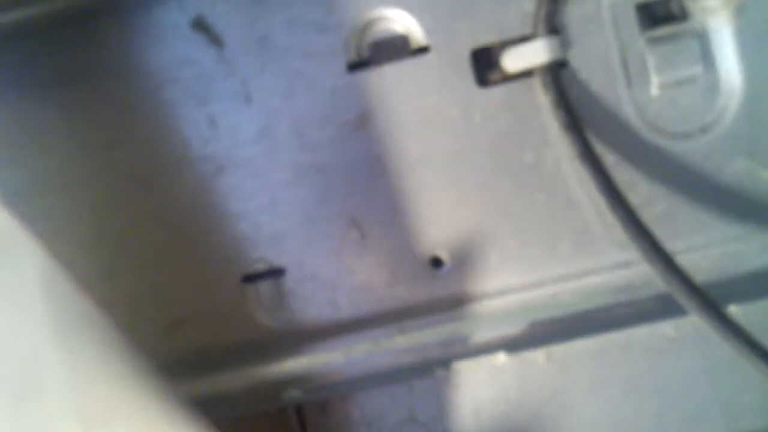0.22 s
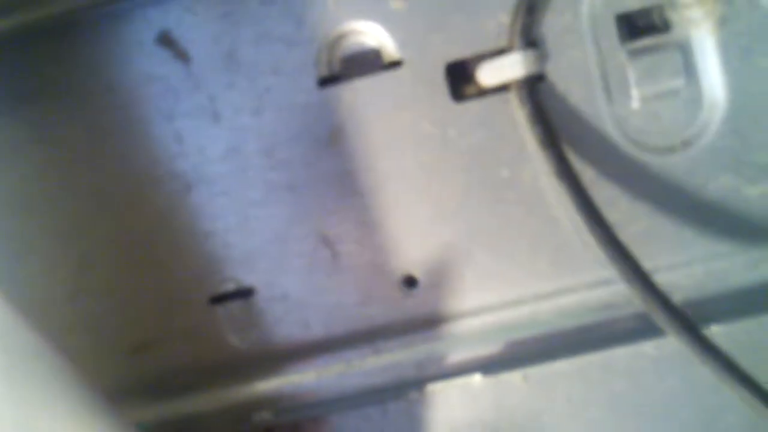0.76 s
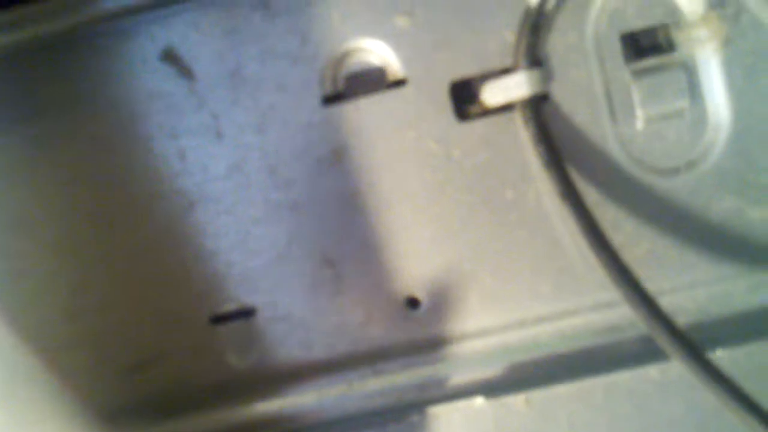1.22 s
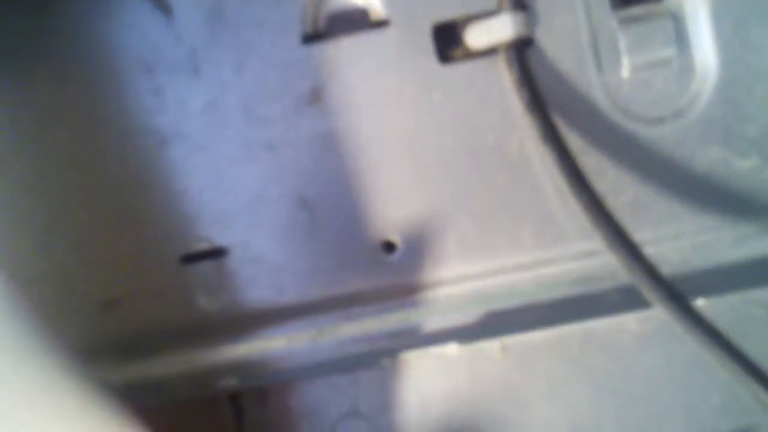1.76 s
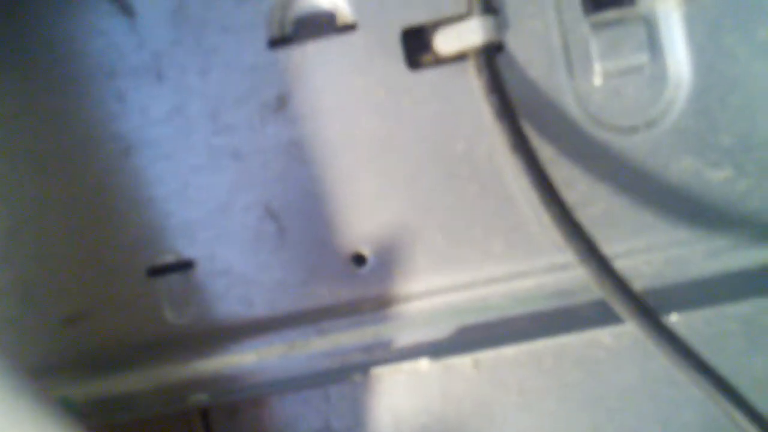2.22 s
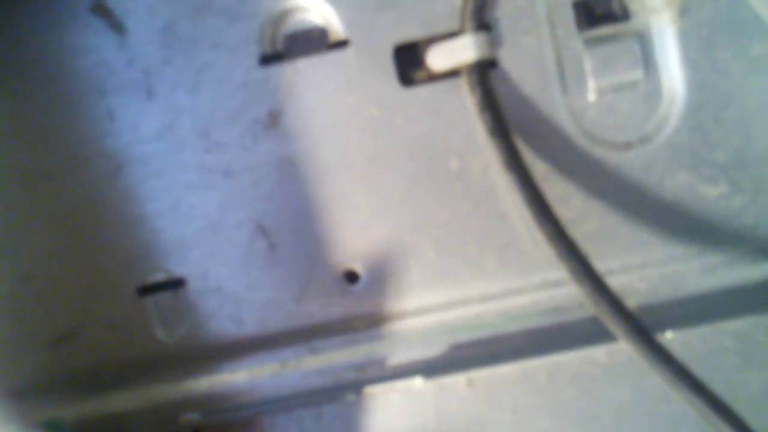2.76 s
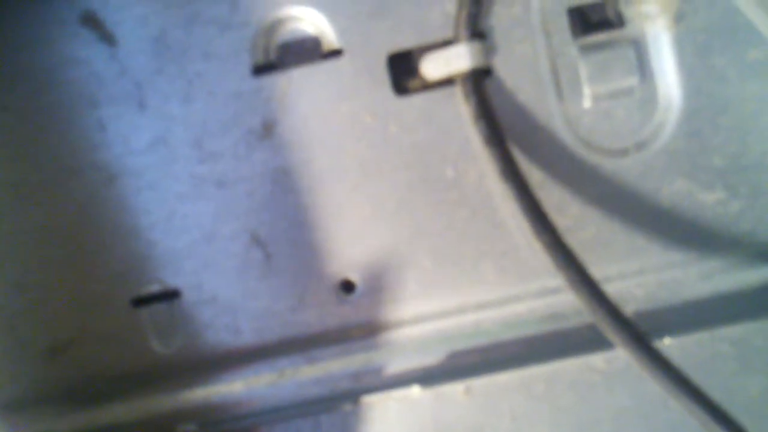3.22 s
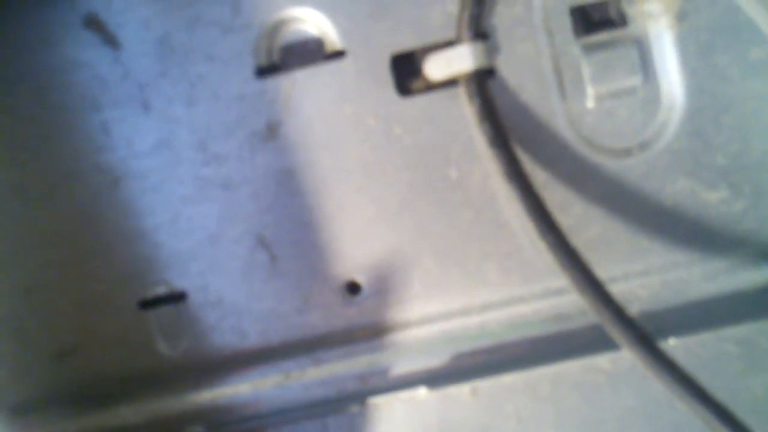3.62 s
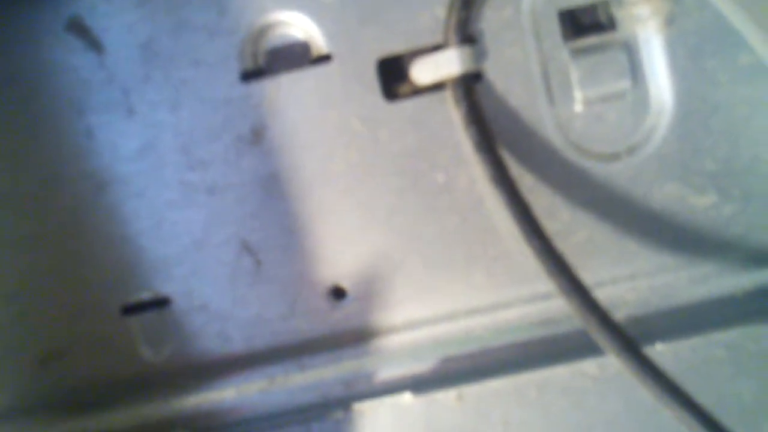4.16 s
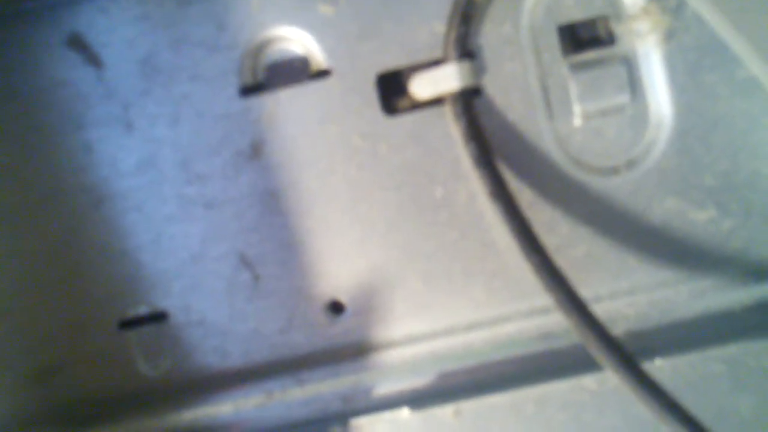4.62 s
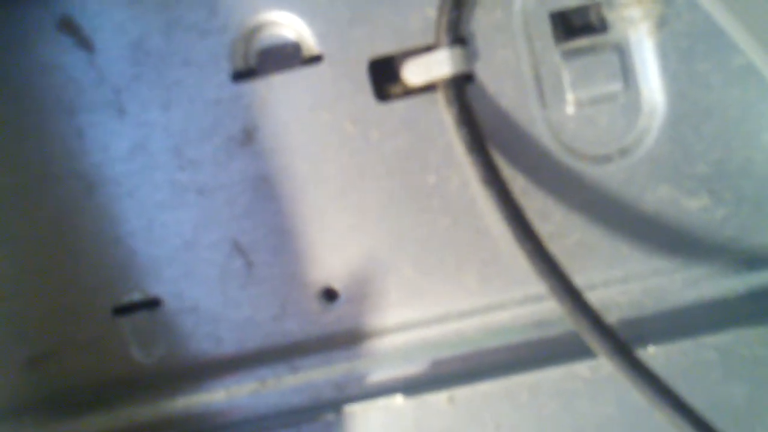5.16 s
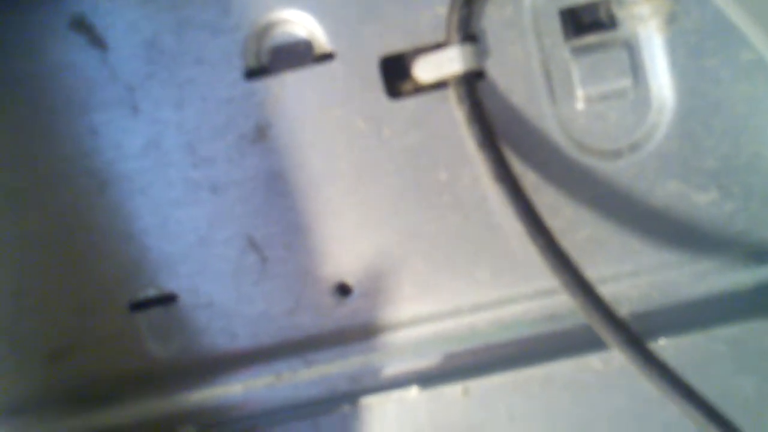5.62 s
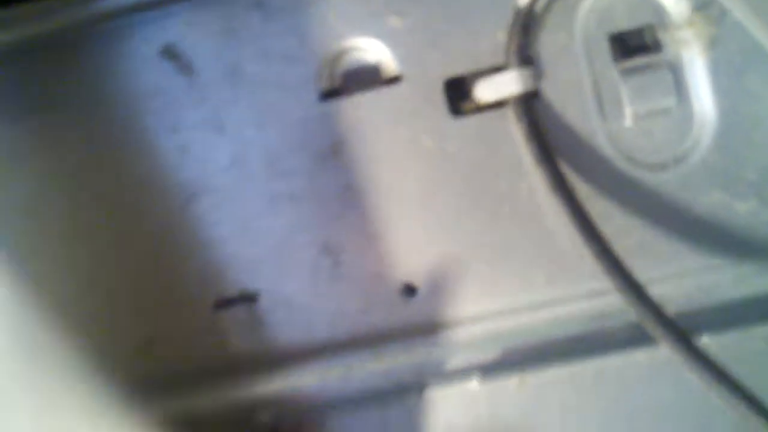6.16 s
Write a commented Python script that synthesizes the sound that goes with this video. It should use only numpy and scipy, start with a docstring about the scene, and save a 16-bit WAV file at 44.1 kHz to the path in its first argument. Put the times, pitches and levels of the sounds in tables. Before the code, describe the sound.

In a quiet room, a hand fits a memory stick into an open steel computer case. A faint tick and light brushing lead to sharp, bright double knocks, then scattered taps, short scrapes and small finger creaks on the camera. The heaviest, fuller metallic clunk comes near the end, followed by a tap, creaks and a brush. Close wide stereo handheld microphone with soft hiss.

```python
"""Port hiss and quiet room air, both shaped noise, run throughout: a hand seats a memory stick in an open
sheet-steel computer case. A faint tick and a brush (sparse slips through the case) lead to firm knocks near
0.5 s: noise cracks, case clatter and panel modes. Scrapes (slips driving the case), lighter contacts, brushes
and finger creaks on the camera (noise bursts) follow. The heaviest knocks come near 6 s, then creaks and
a last brush. The camera's two close ports are cross-subtracted to widen the stereo."""
import sys
import numpy as np
from scipy import signal
from scipy.fft import rfft, irfft, next_fast_len
from scipy.io import wavfile
from scipy.ndimage import uniform_filter1d

SR = 44100
rng = np.random.default_rng(int(sys.argv[2]) if len(sys.argv) > 2 else 0)


def digitize_waveform(pressure):
    """Quantize a signal to 16-bit integers and store it at the path in sys.argv[1].

    Rows of a 2-D input are taken as channels; values are limited to [-1, 1].
    """
    field = np.atleast_2d(pressure).T
    bounded = np.clip(field, -1, 1)
    quanta = np.round(bounded * 32767).astype(np.int16)
    wavfile.write(sys.argv[1], SR, quanta)


N = 282240

# Relative spectrum of each port's steady hiss: (frequency [Hz], level [dB])
HISS_SPECTRUM = [(20, -37), (50, -15), (100, 3.5), (170, -0.5), (300, 0), (500, -8), (900, -12),
                 (1500, -18), (2500, -24), (4000, -22.5), (5500, -26), (8000, -19.5), (13500, -18.5)]
# Relative spectrum of the still room air: (frequency [Hz], level [dB])
AIR_SPECTRUM = [(20, -55), (60, -58), (150, 19), (300, 10.5), (700, -7.5), (1100, -6), (1800, -3),
                (4000, -7), (12000, -33)]
# Sweeps of the hand over cables and metal: (time of height [s], half length [s], relative level [dB])
BRUSHES = [(0.33, 0.37, -63), (1.46, 0.37, -66.5), (2.496, 0.72, -71.5), (4.12, .07, -71.5),
           (5.2, 0.39, -72), (5.864, 0.13, -60), (6.4, 0.085, -57.5)]
# Runs of finger slips on the camera: (time of first slip [s], slips [count], gap [s],
# half length of a slip [s], relative creak level [dB], mid-run accent [dB], relative thump level [dB])
GRIPS = [(.832, 1, 0, 0.0024, -67, -2, -50.5), (1.6413, 1, 0, 0.00092, -39, -2.5, -32),
         (3.008, 4, 0.0086, 0.0033, -47.5, 11, -39.5), (5.339, 5, .0545, 0.0078, -58.5, 8.5, -56.5),
         (6.346, 3, 0.023, 0.0083, -44, -1.5, -47.5)]
# Resonances of the camera's plastic shell: (frequency [Hz], level [dB])
SHELL_SPECTRUM = [(60, -26), (300, -17), (700, -9), (1050, 11.5), (1350, 3), (1680, -6.5), (2100, -18.5),
                  (4000, -28.5), (13000, -47)]
# Low thump through the camera body: (frequency [Hz], level [dB])
THUMP_SPECTRUM = [(30, -37), (80, -12.5), (160, 24), (350, 7.5), (700, 4.5), (1500, -75), (6000, -77)]
# Slides of the stick: (time [s], relative level [dB], bass [dB], body [dB], hardness [dB],
# ring frequency [Hz], half length [s])
SCRAPES = [(.639, -38.5, 3, 2.5, 0.5, 840, 0.018), (1.195, -47.5, 9.5, 5.5, -1.5, 640, 0.031),
           (1.376, -36, -19, 2, -3.5, 1090, 0.01), (1.451, -62, -2, 14, 11, 1070, 0.11),
           (2.133, -50, 9, 5, -4, 645, 0.012), (2.914, -62.5, 21.5, 20.5, -13, 800, 0.018),
           (3.828, -44.5, 11.5, 0, -6.5, 596, 0.015), (3.89, -35.5, -6, 6.5, -4.5, 695, .018),
           (4.147, -52, -14, -0.5, -1.5, 710, 0.022), (5.762, -42, 14, 11.5, 1, 1245, 0.024),
           (5.788, -33.5, 18.5, 0, -2, 1156, 0.006), (5.88, -36, 13, -8, 3, 764, 0.0036),
           (6.193, -45, 15, -5, -6, 1210, 0.011)]
# Contacts of the stick: (time [s], relative level [dB], bass [dB], body [dB], hardness [dB],
# ring frequency [Hz], ring level [dB])
KNOCKS = [(.085, -33.5, 3.5, 9, -15.5, 895, 11), (.4444, -18.5, 4, 0, 4, 3600, 7),
          (.452, -21, -17, 12, -1, 1190, 10.5), (.48, -30, 18.5, -15, -0.5, 224, 7.5),
          (.501, -17.5, 2.5, -1, 1.5, 1970, 9), (.508, -32, 17.5, 14, -6.5, 800, 14),
          (1.536, -27, 12.5, 8.5, 1, 387, 8.5), (1.816, -37, -1, 7, 7, 1960, 16.5),
          (1.901, -40, -20, 1, -0.5, 4000, 7), (2.2, -55, 14, 18.5, -3.5, 4050, 22),
          (2.2646, -20, -8, -3.5, -11, 1930, 7), (2.323, -35, -10, 7, -10, 1260, 15),
          (2.331, -35, 8, 12, -12.5, 3380, 14), (2.44, -48, 3, 13, 0.5, 1270, 16.5),
          (2.677, -37, 1, 15, -6, 573, 5), (2.688, -38.5, 14.5, 15.5, -7, 765, 5.5),
          (2.864, -50, 10, 15, -14, 780, 3.5), (3.136, -41.5, 16, 10, -8, 920, 5),
          (3.266, -31.5, 13.5, 17, -5, 965, 9.5), (3.386, -55.5, 13, 3, 11.5, 1890, 19),
          (3.857, -37, 11, 6, -4, 1410, 18), (3.876, -28, -22, -6, -2, 1640, 14.5),
          (3.89, -24.5, -2.5, -5, -27, 1700, 3), (3.902, -36, -15, 14, -19, 770, 10),
          (4.261, -46.5, -17, 3, -5, 2000, 9.5), (4.7, -44.5, -8, 11, -12, 650, 6),
          (5.082, -41.5, 11, 3, -12, 1150, 11), (5.093, -34.5, -6, 6, -5, 1820, 8),
          (5.227, -32.5, -9, 11.5, -7, 896, 11), (5.237, -30.5, 6, -11, -7, 1270, 8.5),
          (5.667, -44, -11, -7, 9, 1292, 8), (5.858, -43, 4, 8, -11, 3270, 11),
          (5.887, -29.5, 14.5, 5, -8, 740, 12.5), (5.9845, -17, -1, 3.5, -5, 1220, 5),
          (6.005, -16.5, 6.5, 5.5, -3, 990, 13), (6.012, -12.5, 3.5, -16, -3, 307, 13.5),
          (6.017, -14, -2.5, 6.5, -.5, 570, 7.5), (6.216, -26, 9.5, 8.5, -10.5, 940, 5.5)]
# Spectrum of a contact on the case, before its own tone: (frequency [Hz], level [dB])
CASE_SPECTRUM = [(30, -43), (90, 0.5), (170, -7.5), (300, -7.5), (560, -7), (800, -7.5), (1200, -2.5),
                 (1500, -5), (1950, -5.5), (2500, -5.5), (3500, -7.5), (5200, -10.5), (6700, -11),
                 (8000, -11), (14000, -14)]
# Decay of the case's clatter at length 1: (frequency [Hz], t60 [s])
CASE_DECAY = [(150, 0.58), (400, 0.28), (1000, 0.15), (2000, 0.092), (4000, 0.065), (12000, 0.06)]
# Panel modes, before contact tone and finger damping: (frequency [Hz], level [dB], t60 [s])
PANEL_MODES = [(178, -7, 0.67), (225.7, -6, 1), (301, -1.5, 0.11), (321, -14, 0.62), (420, -9.5, 0.31),
               (569, 0, 0.12), (784.6, 0, 0.12), (901.7, -1.5, 0.085), (1022, -16, 0.15), (1097, -9, 0.087),
               (1217.6, -2.5, 0.089), (1277, -5, 0.17), (1432, -9.5, 0.22), (1639, 1.5, 0.096),
               (1630, -6.5, 0.08), (1820, -15.5, 0.096), (3068, 0, 0.072), (3646, -7.5, 0.066),
               (4170, -13.5, 0.14), (6950, 10, 0.035)]
# Likeness of a near sound at the two ports: (frequency [Hz], likeness [0-1])
PORT_LIKENESS = [(200, 0.85), (600, 0.61), (1200, 0.34), (3000, 0), (10000, 0.1)]
# Far port against near; the camera body shades it from low panel sound: (frequency [Hz], level [dB])
FAR_PORT = [(150, -6.5), (300, -2.5), (700, -7), (1300, -3), (2000, 2.5), (4000, 1.5), (12000, -0.5)]
# Share of the opposite port that is subtracted: (frequency [Hz], share [0-1])
CROSS_SHARE = [(100, 1), (2600, 1), (5200, 0.39), (13000, 0.1)]

PORT_DELAY = 17  # samples
EDGE_HZ = 14250  # upper band limit
RING_SIZE = 15360  # samples in the response to one blow
# level at 8 kHz: an offset [dB], and the gain per dB of hardness [dB/dB]
SPARKLE_DB, SPARKLE_PER_HARDNESS = -3, 1.35
# the hand shortens the ring by these factors: holding the stick in a knock, pressing it down in a slide
HELD_DECAY, SLIDING_DECAY = 0.8, 0.8
DECAY_PER_BASS = 0.0072  # share of decay time gained per dB of bass: light contacts die away sooner
SCRAPE_RING_DB = 12  # how far a slide brings out the resonance of its spot
THUMP_FADE_DB = 2.0  # lost with each slip: the finger's first giving way is strongest
THUMP_HALF_S = 0.0025  # least half length of the camera body's settling


def amp(db):
    """Decibel definition: 20 dB is a factor of ten in amplitude."""
    return 10 ** (np.asarray(db) / 20)


def unit_rms(x):
    """Power normalisation: scale a signal to a root-mean-square of one."""
    return x / np.sqrt(np.mean(x ** 2) + 1e-20)


def read(points, hz):
    """Linear interpolation of a table along a logarithmic frequency axis."""
    f, value = np.transpose(points)
    return np.interp(np.log(hz + 1), np.log(f + 1), value)


def bins(size):
    """Discrete Fourier frequencies [Hz] of a real signal."""
    return np.fft.rfftfreq(size, 1 / SR)


def bell(t, half):
    """Gaussian envelope: a smooth swell and fade around t = 0, with standard deviation half."""
    return np.exp(-.5 * (t / half) ** 2)


def add(mix, s, sound):
    """Superposition: sum a sound into the mix from time s."""
    part = mix[:, max(round(s * SR), 0):][:, :sound.shape[1]]
    part += sound[:, :part.shape[1]]


def lag(hz, lag_ms):
    """Shift theorem: a delay is a phase that falls in proportion to frequency."""
    return np.exp(-2j * np.pi * hz * lag_ms / 10 ** 3)


def port_noise(gain, size, alike, far_db, lag_ms):
    """Partial coherence: coloured noise at two ports, with a level offset and lag at the far one."""
    near, other = rfft(rng.standard_normal((2, size)))
    alike = np.clip(alike, 0, 1)
    mixed = alike * near + np.sqrt(1 - alike ** 2) * other
    far = mixed * amp(far_db) * lag(bins(size), lag_ms)
    return irfft(np.array([near, far]) * gain, size)


def slips(size, per_s):
    """Stick-slip friction: sparse random kicks of uneven size."""
    kicks = rng.random(size) < per_s / SR
    return unit_rms(rng.standard_normal(size) * kicks)


def colour(hz, bass_db, body_db, hard_db, ring_hz, ring_db, ring_width=0.073):
    """Contact stiffness: hard blows are bright, blunt ones move the panel; each spot favours a resonance."""
    sparkle_db = SPARKLE_DB + SPARKLE_PER_HARDNESS * hard_db
    tilt = [(280, bass_db), (680, body_db), (1300, 0.039), (2000, 0), (3400, hard_db), (8000, sparkle_db)]
    resonance_db = ring_db / (1 + ((hz / ring_hz - 1) / ring_width) ** 2)
    return amp(read(CASE_SPECTRUM, hz) + read(tilt, hz) + resonance_db)


def panel_rings():
    """Modal vibration: the damped free ringing of each panel mode, one row a mode."""
    t = np.arange(RING_SIZE) / SR
    return np.array([amp(db - 60 * t / t60) * np.exp(2j * np.pi * hz * t) for hz, db, t60 in PANEL_MODES])


def clatter(tone, length, room_db=-28, room_t60=0.38, lag_ms=0.17, rise_cycles=0.092, rise_s=0.0034,
            rattle_db=2, size=90):
    """Dense modal overlap: noise decaying by band stands for countless short modes and a faint room tail."""
    hz = bins(RING_SIZE)
    gain = colour(hz, *tone)
    noise = port_noise(gain, RING_SIZE, read(PORT_LIKENESS, hz), read(FAR_PORT, hz), lag_ms)
    f, age, z = signal.stft(noise, SR, nperseg=128)
    case_decay = amp(-60 * age / (length * read(CASE_DECAY, f[:, None])))
    room_decay = amp(room_db - 60 * age / room_t60)
    # low notes take longer to build up
    rise = 1 - np.exp(-(age + rise_s) * (f[:, None] + 100) / rise_cycles)
    decay = np.hypot(case_decay, room_decay) * rise
    # once struck, loose parts chatter and make the decay uneven
    chatter = unit_rms(uniform_filter1d(rng.standard_normal(len(age)), size=3))
    rattle = amp(rattle_db * np.tanh(age / 0.028) * chatter)
    spectrum = rfft(signal.istft(z * decay * rattle, SR, nperseg=128)[1], RING_SIZE)
    # scale the smoothed spectrum so that each band has the energy set by colour and decay
    decay_energy = np.interp(hz, f, np.mean(decay ** 2, axis=1))
    band_energy = gain ** 2 * decay_energy * RING_SIZE * (1 + amp(2 * read(FAR_PORT, hz)))
    excess = uniform_filter1d(np.sum(abs(spectrum) ** 2, axis=0) / band_energy, size)
    return irfft(spectrum / np.sqrt(excess), RING_SIZE)


def response(rings, tone, length, modes_db=-16, lag_ms=0.23, attack_s=0.00091, damping_db_per_s=250):
    """Impulse response: one blow gives clatter and longer panel modes, which a pressing finger damps."""
    t = np.arange(RING_SIZE) / SR
    hz = np.transpose(PANEL_MODES)[0]
    near = amp(modes_db) * colour(hz, *tone) * np.exp(2j * np.pi * rng.random(len(hz)))
    far = near * amp(read(FAR_PORT, hz)) * lag(hz, lag_ms)
    damping = amp(-damping_db_per_s * max(1 / length - 1, 0) * t)
    modes = (np.array([near, far]) @ rings).real * damping
    attack = 1 - np.exp(-t / attack_s)
    fade = np.minimum(2 - 2 * t / t[-1], 1) ** 2  # over the second half
    return (clatter(tone, length) + modes) * attack * fade


def noise_floor(hiss_db=-64.5, air_db=-72):
    """Coherence of noise: each port's hiss is its own, while the room's air is partly shared."""
    hz = bins(N)
    hiss = unit_rms(port_noise(amp(read(HISS_SPECTRUM, hz)), N, 0, 0, 0))
    air = unit_rms(port_noise(amp(read(AIR_SPECTRUM, hz)), N, read(PORT_LIKENESS, hz), -4.1, 0))
    return amp(hiss_db) * hiss + amp(air_db) * air


def rustle(rings, level_db=-2, slips_per_s=300, low_cut_hz=170):
    """Friction: the hand brushes cables and metal; sparse light slips ring the case faintly, lows cut."""
    touch = response(rings, (8.5, 3.5, -1.0, 1150, 1.5), 1)
    brush = signal.oaconvolve(slips(N, slips_per_s)[None], touch, axes=1)[:, :N]
    brush = signal.sosfilt(signal.butter(2, low_cut_hz, "highpass", fs=SR, output="sos"), brush)
    t = np.arange(N) / SR
    sweeps = sum(amp(db) * bell(t - s, half) for s, half, db in BRUSHES)
    return unit_rms(brush) * amp(level_db) * sweeps


def grips(size=8192, creak_db=-3, thump_db=0):
    """Near-field stick-slip: skin slips on the camera shell, too close to wake the case or room."""
    out, hz = np.zeros((2, N)), bins(size)
    t = (np.arange(size) - size / 2) / SR
    shell, body = amp(read(SHELL_SPECTRUM, hz)), amp(read(THUMP_SPECTRUM, hz))
    for s, count, gap, half, db, accent_db, low_db in GRIPS:
        slip = bell(t, half)
        settle = bell(t, max(half, THUMP_HALF_S))
        count = round(count)
        for k in range(count):
            mid_run = abs(k - (count - 1) / 2) < 1
            creak = unit_rms(slip * port_noise(shell, size, 0.1, -2.1, .015))
            thump = unit_rms(settle * port_noise(body, size, 1.0, -43, .01))
            creak_gain = amp(db + creak_db + accent_db * mid_run)
            thump_gain = amp(low_db + thump_db - THUMP_FADE_DB * k)
            sound = creak_gain * creak + thump_gain * thump
            # longer slips carry more energy
            add(out, s + k * gap + t[0], sound * np.sqrt(np.mean(slip ** 2)))
    return out


def scrapes(rings, level_db=-26, slips_per_s=900):
    """Convolution: a swell of tiny stick-slip kicks drives the response of the case."""
    out = np.zeros((2, N))
    t = np.arange(-SR // 5, SR // 5) / SR
    for s, db, *tone, half in SCRAPES:
        drive = slips(len(t), slips_per_s) * bell(t, half)
        case = response(rings, (*tone, SCRAPE_RING_DB), SLIDING_DECAY)
        add(out, s + t[0], amp(db + level_db) * signal.fftconvolve(drive[None], case, axes=1))
    return out


def knocks(rings, level_db=-3, graze_db=-26, graze_s=0.0047, crack_db=-2, crack_s=0.0029,
           jolt_db=-17, jolt_s=0.071, jolt_hz=130, size=8192):
    """Impact excitation: the stick grazes, cracks and sets the case ringing; a jolt reaches the camera."""
    out, hz = np.zeros((2, N)), bins(size)
    t = (np.arange(size) - size / 2) / SR
    graze = amp(graze_db) * np.exp(-abs(t) / graze_s)
    contact = np.where(t < 0, graze, amp(crack_db) * np.exp(-abs(t) / crack_s))
    shake = np.maximum(t, 0) / jolt_s * np.exp(1 - abs(t) / jolt_s) * signal.windows.hann(size)
    deep = amp(read(THUMP_SPECTRUM, hz)) / (1 + (hz / jolt_hz) ** 4)
    for s, db, *tone in KNOCKS:
        bass_db = tone[0]
        crack = port_noise(colour(hz, *tone), size, read(PORT_LIKENESS, hz), read(FAR_PORT, hz), 0) * contact
        # the jolt shakes the near port more
        jolt = port_noise(deep, size, 1.0, -4, 0) * shake
        add(out, s + t[0], amp(db) * (crack + amp(jolt_db + bass_db) * jolt))
        length = HELD_DECAY * (1 + DECAY_PER_BASS * bass_db)
        add(out, s, amp(db + level_db) * response(rings, tone, length))
    return out


def scene():
    """Superposition of all sources, from the background to the knocks."""
    rings = panel_rings()
    return noise_floor() + rustle(rings) + grips() + scrapes(rings) + knocks(rings)


def record(dry):
    """Delay-and-subtract: each port minus the delayed other combs the spectrum; a low-pass then limits it."""
    size = next_fast_len(N + 4096)
    hz, ports = bins(size), rfft(dry, size)
    delay = np.exp(-2j * np.pi * hz * PORT_DELAY / SR)
    wide = ports - np.clip(read(CROSS_SHARE, hz), 0, 1) * delay * ports[::-1]
    lowpass = signal.firwin(401, EDGE_HZ, window=("kaiser", 8), fs=SR)
    return signal.oaconvolve(irfft(wide, size)[:, :N], lowpass[None], "same", axes=1)


dry = scene()
out = record(dry)
digitize_waveform(out)
```